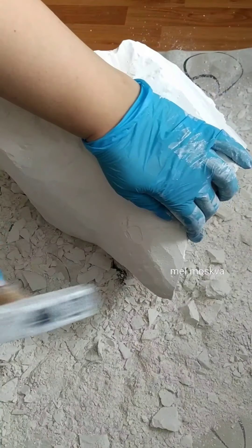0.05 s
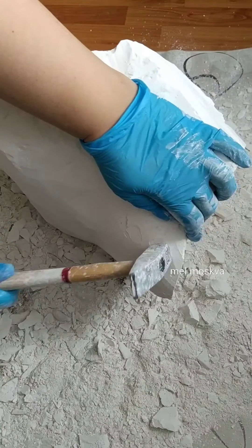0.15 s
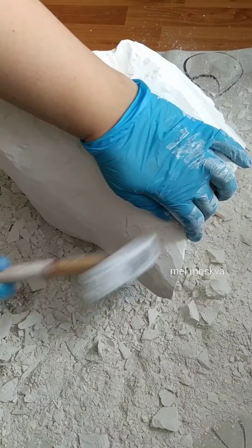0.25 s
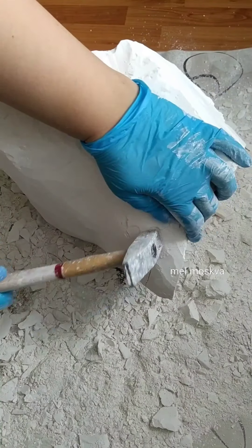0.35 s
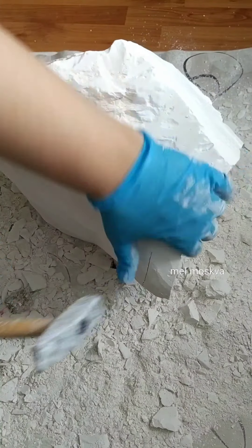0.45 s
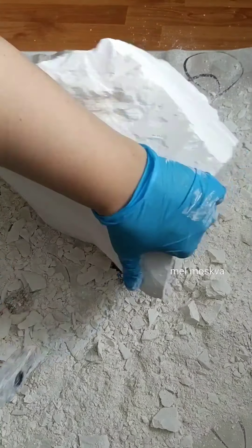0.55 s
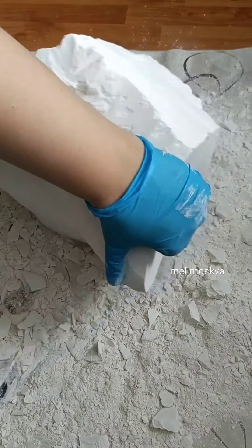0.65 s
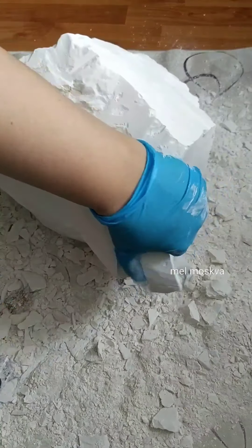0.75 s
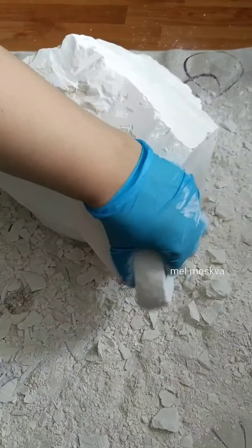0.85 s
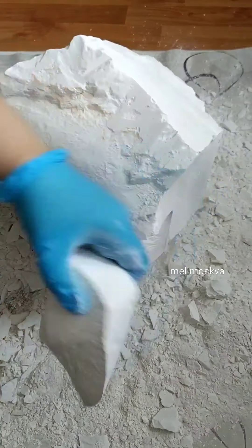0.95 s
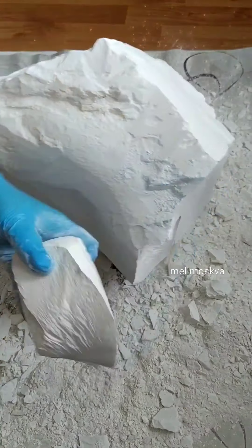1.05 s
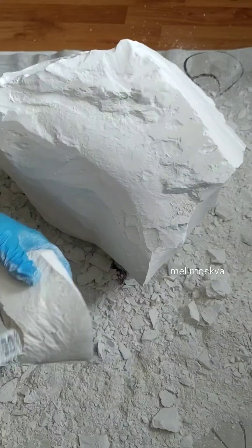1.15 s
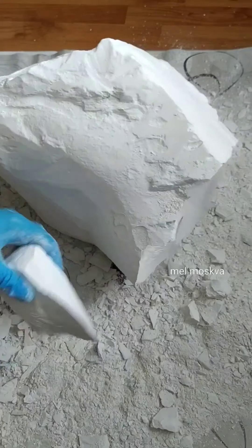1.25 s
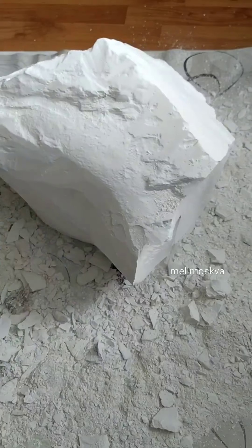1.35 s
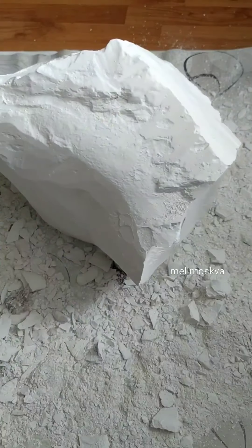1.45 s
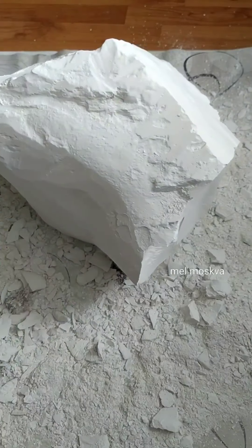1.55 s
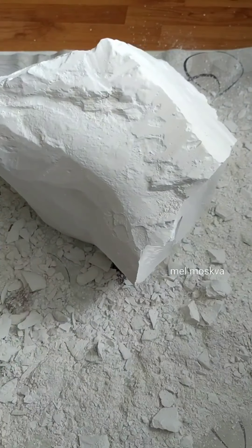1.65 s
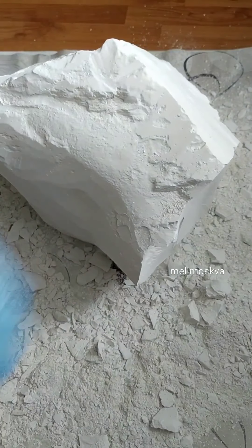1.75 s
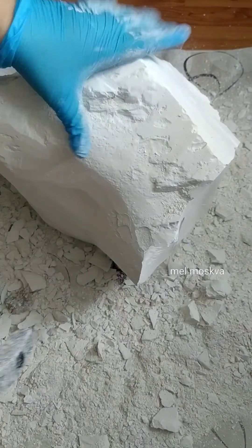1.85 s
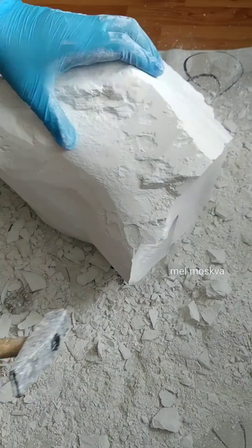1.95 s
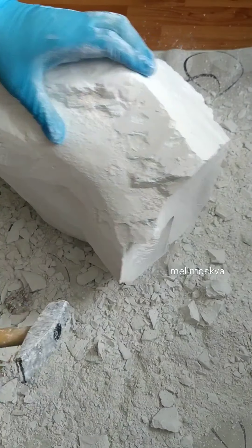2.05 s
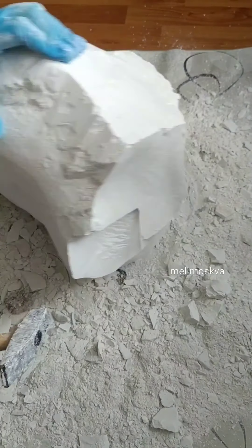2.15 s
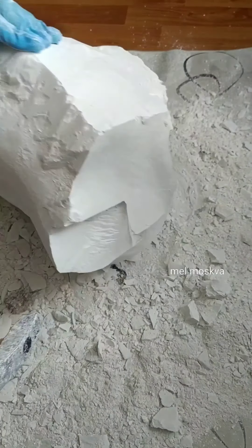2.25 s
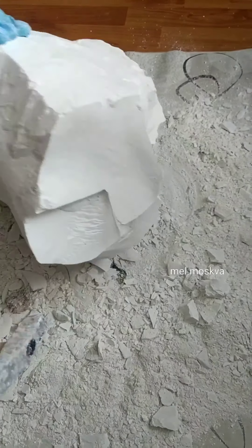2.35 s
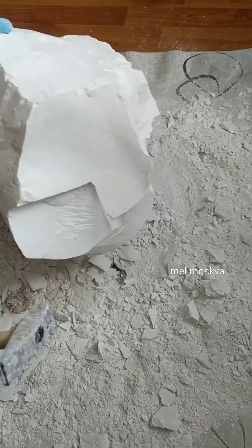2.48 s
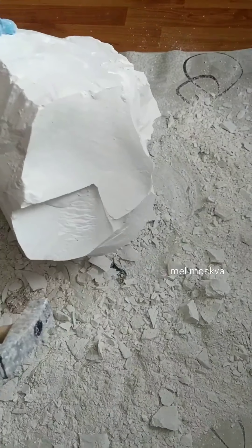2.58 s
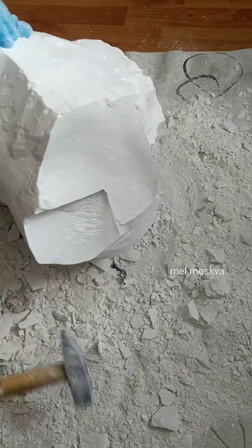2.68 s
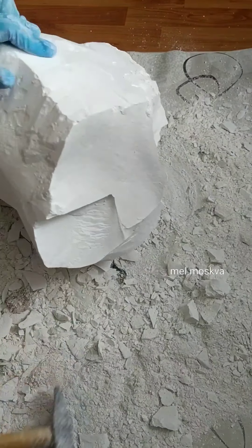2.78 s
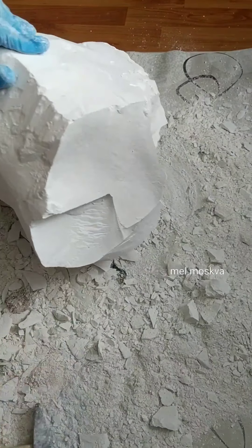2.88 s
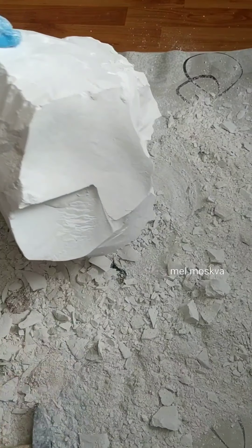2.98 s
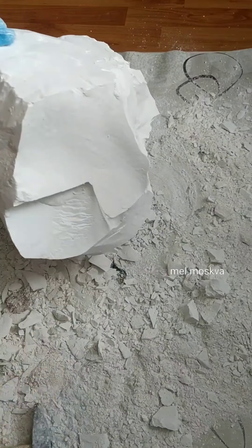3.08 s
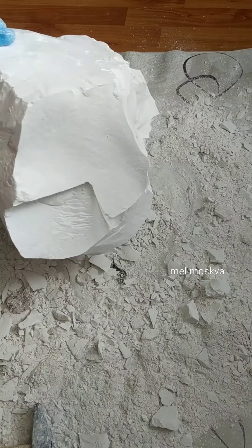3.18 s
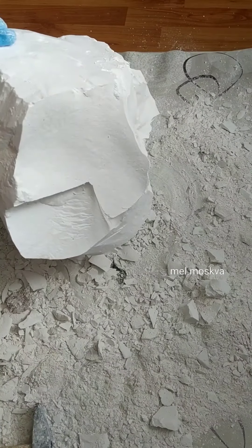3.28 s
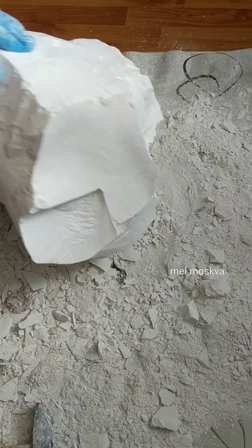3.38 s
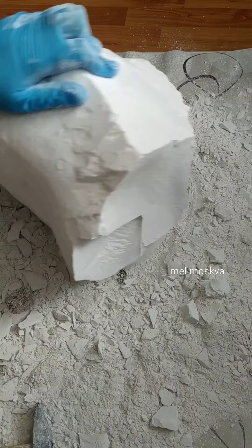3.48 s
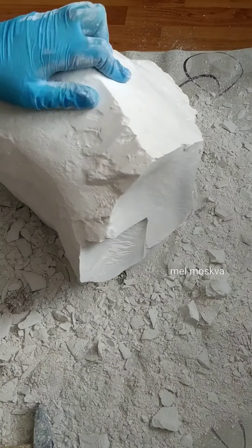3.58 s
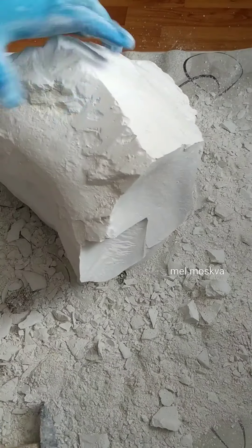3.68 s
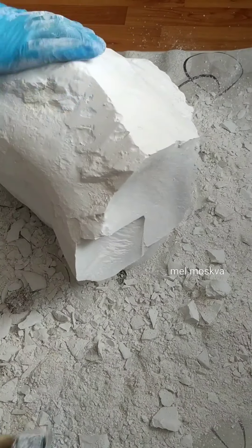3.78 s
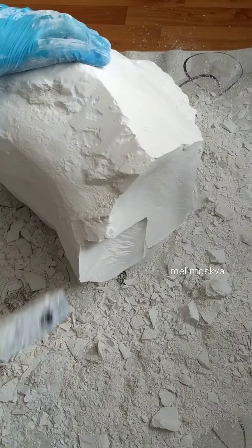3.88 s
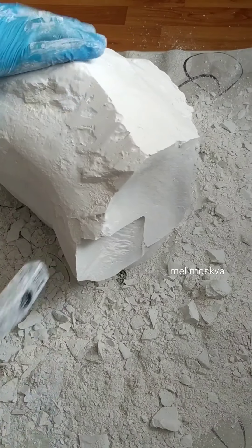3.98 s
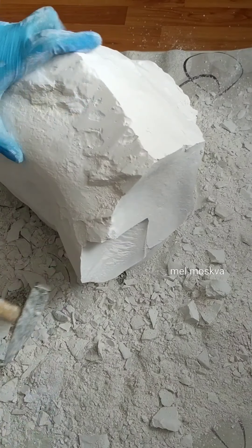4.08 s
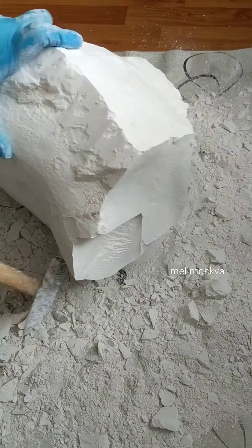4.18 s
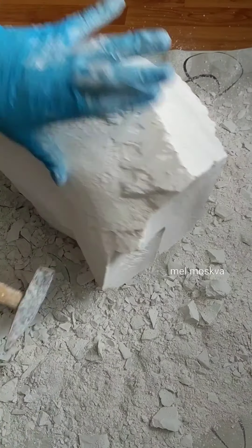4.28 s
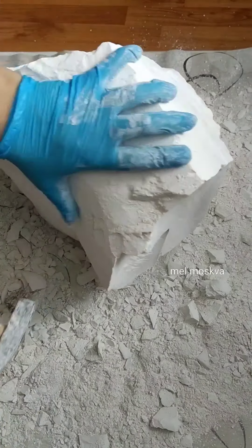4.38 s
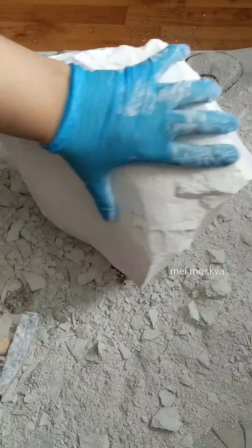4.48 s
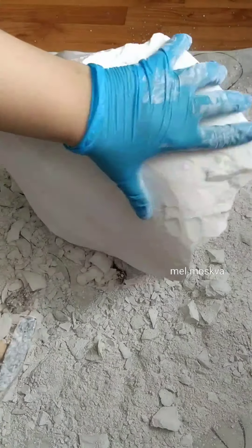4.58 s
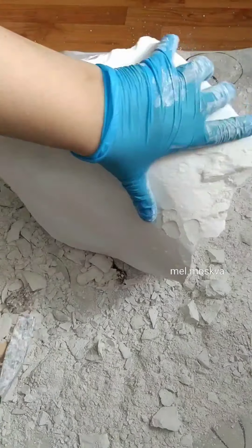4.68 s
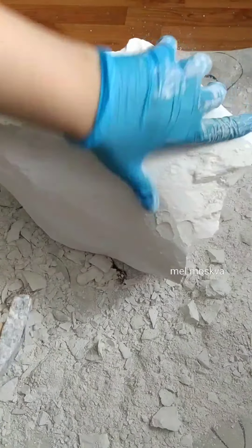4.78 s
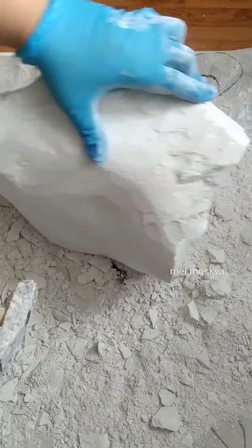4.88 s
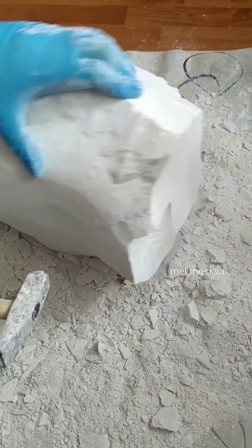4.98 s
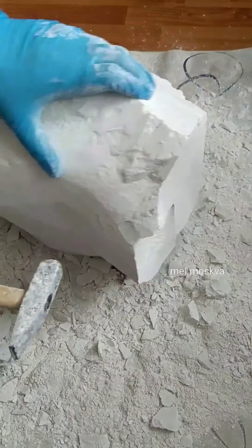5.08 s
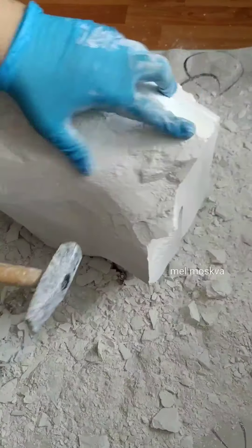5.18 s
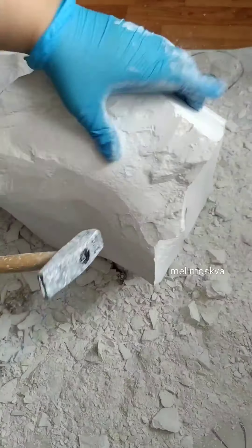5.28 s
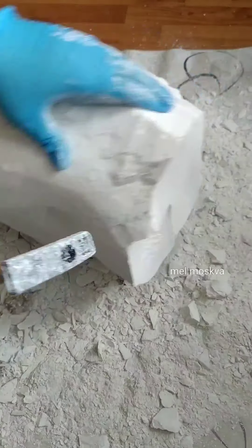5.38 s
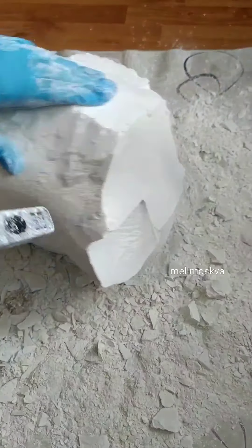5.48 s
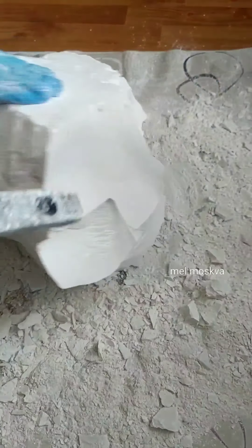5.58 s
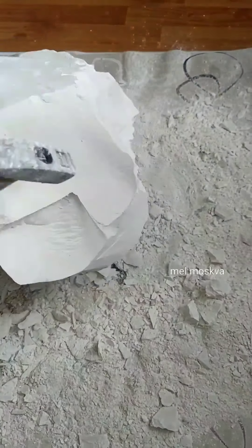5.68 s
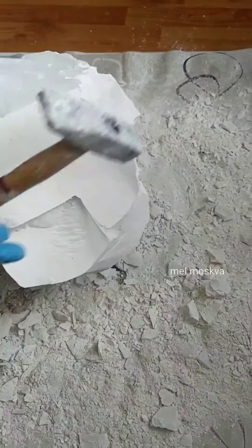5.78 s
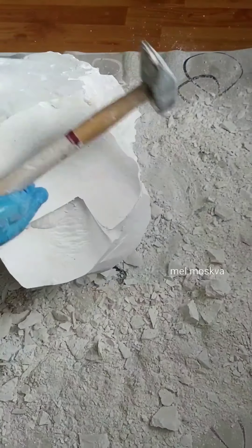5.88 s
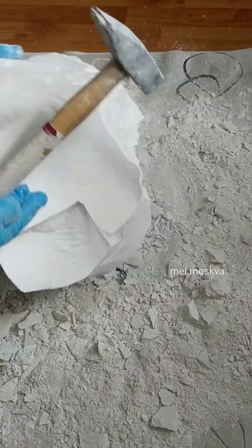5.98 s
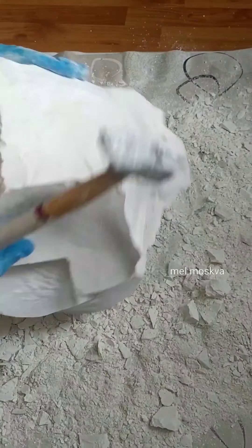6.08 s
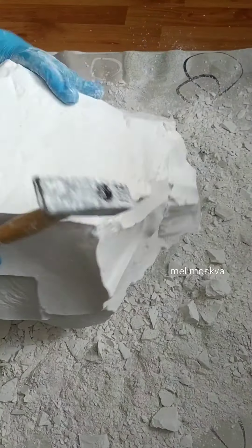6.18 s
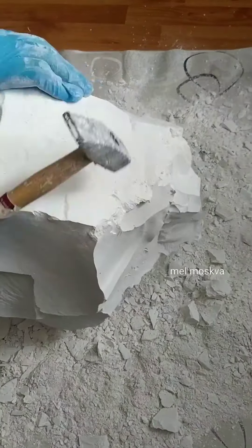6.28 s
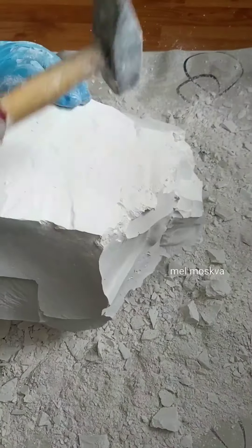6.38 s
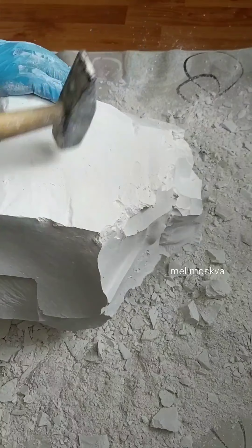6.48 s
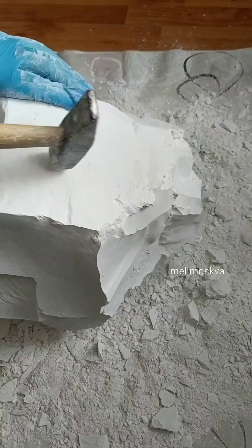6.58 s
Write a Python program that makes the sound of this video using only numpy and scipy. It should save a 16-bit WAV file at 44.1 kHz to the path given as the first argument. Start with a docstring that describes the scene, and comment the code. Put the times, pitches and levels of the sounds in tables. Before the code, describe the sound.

A close, dry phone pickup in a small room with soft hiss and a barely audible low hum. At 0.0, 0.3 and 0.45 seconds a hammer cracks into a heavy chalk block: loud, brittle knocks with bright splintering tails, the first lower in pitch, the third softer, with faint floor thuds. From 0.6 to 1.2 a piece crumbles away with grit, scraping and snaps. Quiet dusty rustles follow; around 1.75 to 1.8 the steel head rattles lightly on grit. At 2.2 to 2.65 the block turns with a dense crunch and clustered clicks. Sparse shuffles follow, with a short crunch near 3.65. From 4.3 the rocking gets busier, chips ticking and grit grinding, with a strong snap at 5.2. More crunches come around 5.5 to 5.8. A final bright hammer crack lands at 6.2, then grinding, dust and a last chip at 6.5.

```python
"""A hammer cracks into a heavy block of dry chalk: three blows over quiet room tone and a faint low hum.
The block lies on a cloth over a wooden floor, under a phone in a small dry room. A gloved hand then turns
and rocks it over the rubble: chips snap, grit grinds, dust hisses; one more blow lands near the end.
Blows and chips are clicks and noise bursts ringing resonators; rubble and steel rattle are random clicks
through resonators; thuds are dying sines, the hum a wavering sine with a noise band, the air shaped noise."""
import sys
import numpy as np
from scipy import signal
from scipy.fft import rfft, irfft
from scipy.io import wavfile
from scipy.ndimage import uniform_filter1d

SR = 44100
rng = np.random.default_rng(int(sys.argv[2]) if len(sys.argv) > 2 else 0)


def pcm_store(signal):
    """Save signal as 16-bit PCM."""
    levels = np.round(np.clip(np.atleast_2d(signal), -1, 1) * 32767)
    wavfile.write(sys.argv[1], SR, levels.astype(np.int16).T)


N = 292824

# still room tone, relative spectrum: f/Hz, level/dB
AIR_SPECTRUM = [(15, -64.5), (25, -58), (60, -8), (192, -7.5), (232, -6.5), (296, -9), (330, -8),
                (746, -5.5), (854, -12.5), (2750, -20), (16500, -25.5)]
# low tone under the first blows: t/s, rms level/dB
HUM_LEVELS = [(0.0, -70), (0.05, -64), (0.26, -77), (0.33, -59.5), (0.364, -73), (0.52, -60), (0.548, -82),
              (0.612, -64), (0.74, -104)]
# hammer on the block: t/s, ring f/Hz, ring peak level/dB, crack centre f/Hz, crack peak level/dB,
# left minus right level/dB, echo level/dB against the usual room echo
HAMMER_BLOWS = [(0.02, 790, -11.5, 6000, -5, 0, -1.5), (0.2799, 1685, -9.5, 6580, -5.5, 0, 1.5),
                (0.4632, 1600, -15.5, 10500, -11, 0, 5.5), (6.2052, 2040, -19, 4700, -8.5, 0, -3.5)]
# body modes of the chalk block: f/Hz, width/Hz, level/dB
BLOCK_MODES = [(389, 60, -20), (608, 19, -1), (670, 600, 0), (1030, 570, 4.5), (1445, 360, -0.5),
               (1927, 610, 1.5), (2740, 410, -6), (3330, 230, -17.5)]
# broad treble bands of cracks and dust: f/Hz, width/Hz, level/dB
CRACK_BANDS = [(5400, 6700, 0.5), (8900, 5200, -6), (13000, 4000, -8), (16200, 6600, 6)]
# floorboards under a blow, one row: f/Hz, t60/s, level/dB against the blow's ring
FLOOR_THUD = (37, 0.12, -46)
# narrow rings heard in the first three hammer blows: f/Hz, width/Hz, peak level/dB against the blow's ring
NARROW_BLOW_MODES = [(592, 31, -20.5), (1780, 52, -25), (5044, 290, -7)]
# the block slides or rocks over the rubble: start t/s, length/s, then dry rms level/dB of lumps, grit
# and dust hiss
RUBBLE_SLIDES = [(0.11, 0.067, -72, -62, -66.5), (0.588, 0.071, -78, -74, -56.5),
                 (0.79, 0.2, -60.5, -57.5, -56.5), (1.06, 0.1, -77, -74, -61),
                 (1.175, 0.084, -104, -75, -63), (1.308, 0.014, -88, -75.5, -69),
                 (1.423, 0.038, -90.5, -81, -59.5), (1.549, 0.09, -88, -94, -68.5),
                 (1.808, 0.028, -74.5, -69, -60), (1.983, .1, -69, -68.5, -64.5),
                 (2.124, 0.084, -72, -63.5, -59.5), (2.281, 0.086, -56, -50.5, -50.5),
                 (2.467, .18, -67.5, -65, -65), (2.857, 0.035, -69, -66.5, -66.5),
                 (2.972, 0.14, -66, -67.5, -57.5), (3.204, 0.057, -66, -62, -58.5),
                 (3.659, 0.05, -58, -54, -51), (3.818, 0.044, -72, -71, -63),
                 (3.894, 0.071, -67.5, -71, -63.5), (4.085, 0.11, -93, -84, -72),
                 (4.294, 0.036, -79, -76, -58.5), (4.389, 0.14, -61, -58.5, -59),
                 (4.597, 0.16, -72, -64.5, -59.5), (4.756, 0.024, -56.5, -54, -54),
                 (4.88, 0.044, -56.5, -58, -59.5), (5.065, 0.15, -54, -69, -55.5),
                 (5.206, .1, -66.5, -62.5, -55), (5.433, 0.053, -74, -70, -60),
                 (5.525, 0.096, -54, -53.5, -52), (5.685, 0.066, -69, -65, -56),
                 (5.805, 0.048, -54.5, -48, -50), (5.947, .07, -85, -82, -69.5),
                 (6.06, 0.032, -61, -62.5, -59), (6.236, 0.085, -51, -51, -49),
                 (6.376, 0.14, -69, -74, -59), (6.498, 0.11, -73, -76.5, -63)]
# chips that snap or knock: t/s, ring peak level/dB, ring f/Hz, crack centre f/Hz,
# crack rms level/dB over its first 10 ms, echo level/dB against the usual room echo
CHIP_SNAPS = [(0.123, -33.5, 670, 7460, -34.5, -6.5), (0.576, -44.5, 1090, 9830, -69, 0.5),
              (0.587, -47, 1100, 6210, -59, 0), (0.643, -43, 1100, 6190, -60, 0),
              (0.658, -43.5, 1110, 8620, -53, 0), (0.75, -44, 1070, 4900, -57, 3),
              (0.767, -40.5, 2130, 5540, -67, -2), (0.776, -43.5, 840, 5730, -58, -7),
              (0.792, -45, 1060, 5100, -53, -2), (0.8, -42, 2040, 7540, -52, 6),
              (0.824, -38.5, 1000, 5760, -49, -4), (0.847, -45, 1200, 6690, -51, -6),
              (0.876, -42, 3090, 7800, -38.5, 2), (0.885, -33, 2130, 6400, -33.5, -6),
              (0.902, -22.5, 2040, 7810, -48, -6), (0.934, -34.5, 740, 6600, -42, -7),
              (0.981, -36.5, 770, 4980, -62, -6), (0.986, -48, 834, 4900, -46, -2),
              (1.06, -44, 775, 9470, -64, -13), (1.073, -67, 670, 6270, -50, -6),
              (1.103, -51, 735, 10400, -46, -2), (1.106, -44, 780, 5700, -49, -3),
              (1.179, -29.5, 1980, 5160, -43, -5.5), (1.247, -50, 1150, 8950, -60, -2),
              (1.259, -54, 830, 9130, -59, -5), (1.327, -61, 635, 9550, -54.5, 4),
              (1.434, -49.5, 850, 9920, -53, -0.5), (1.735, -47, 1050, 10700, -60, 0),
              (1.773, -52, 888, 7810, -50.5, 6), (1.809, -25, 806, 7540, -34, -3),
              (2.13, -43, 2100, 5090, -57, -4), (2.133, -45, 1130, 5300, -49, 5),
              (2.165, -48, 820, 6390, -45, -3.5), (2.201, -38, 2380, 5730, -52, 2),
              (2.218, -32, 2020, 4950, -39.5, -6.5), (2.272, -35.5, 2070, 5250, -52, -0.5),
              (2.276, -29, 2430, 5330, -43, -3), (2.292, -24, 2230, 6970, -51, 9.5),
              (2.294, -18, 2800, 5630, -40, -1.5), (2.302, -31, 2740, 9850, -37, -5),
              (2.306, -19.5, 1960, 6800, -32.5, -4.5), (2.344, -18.5, 2030, 5300, -30, -2.5),
              (2.407, -41, 2830, 5520, -57, -7), (2.449, -40.5, 1170, 4630, -43.5, 4),
              (2.496, -48, 1040, 4800, -64, -2), (2.525, -36.5, 2220, 6680, -60, -4),
              (2.533, -38.5, 2030, 6690, -46, 1.5), (2.585, -47, 1090, 6530, -60, -7),
              (2.613, -49, 1080, 5940, -52, -13), (2.623, -31, 1930, 5800, -41, 1.5),
              (2.648, -35.5, 1110, 10300, -50, -6), (3.105, -48, 724, 6500, -52, -6),
              (3.197, -34.5, 1170, 6390, -44.5, 0.5), (3.233, -30, 1146, 4830, -38.5, 1),
              (3.585, -36, 2130, 4660, -45, 0), (3.645, -39, 1970, 4550, -53.5, -5),
              (3.647, -32.5, 2530, 4580, -49, 3), (3.659, -38, 980, 7410, -37, 1),
              (3.665, -32.5, 2020, 6590, -46.5, 0), (3.694, -28, 2040, 6720, -42, 3.5),
              (3.705, -30.5, 1980, 4950, -40, -1), (3.804, -53, 2420, 5900, -63, 2),
              (3.83, -56.5, 848, 9450, -57, -2), (3.864, -49.5, 719, 9660, -70, 3),
              (3.9, -25.5, 780, 6990, -73, -3), (4.073, -57, 704, 10900, -68.5, 0),
              (4.282, -59, 713, 8990, -54, 1), (4.339, -36, 2330, 8120, -43, -7.5),
              (4.434, -47, 762, 4510, -50, -3), (4.453, -44, 1210, 4780, -49.5, 2),
              (4.477, -30, 2200, 5720, -40, -4), (4.502, -44, 770, 4660, -44.5, -1),
              (4.522, -37, 2300, 4580, -43, -2), (4.612, -40.5, 2160, 6470, -52, 1),
              (4.625, -35.5, 1570, 4870, -47, -5), (4.664, -35.5, 3010, 6320, -41, -4),
              (4.681, -57, 3330, 9640, -51, -2), (4.715, -47, 2050, 5110, -46, -3),
              (4.734, -39, 3330, 5220, -51, -2), (4.74, -32.5, 2980, 5210, -43, 1),
              (4.75, -38.5, 1550, 5260, -45, 2), (4.76, -35.5, 1380, 5040, -43.5, 4),
              (4.795, -20, 1580, 6570, -41, -7.5), (4.859, -30, 1790, 6110, -67, -14),
              (4.879, -32, 1440, 5620, -48, -4), (4.893, -29.5, 1490, 6930, -45.5, -0.5),
              (4.903, -42, 1920, 4750, -48.5, 1), (5.001, -47, 1920, 8750, -58, -1),
              (5.048, -41, 2020, 8660, -64, -7), (5.078, -38.5, 1770, 5400, -55, -1),
              (5.102, -24, 1430, 5970, -32, -6), (5.135, -37, 1390, 6180, -44, 3),
              (5.15, -26.5, 2040, 6200, -37, 2), (5.184, -16, 1820, 5100, -21, -0.5),
              (5.188, -27, 1090, 5800, -39, -3), (5.245, -30, 1480, 8200, -31.5, -6.5),
              (5.303, -41.5, 1170, 8130, -57, -4), (5.593, -32, 3330, 5120, -41, 1),
              (5.593, -32.5, 1990, 5120, -47, 1.5), (5.611, -42, 2180, 7060, -42.5, 2),
              (5.664, -49, 813, 9360, -42, 0), (5.696, -37.5, 2000, 6080, -43.5, -4),
              (5.704, -39, 1110, 5900, -45, -1.5), (5.742, -44.5, 659, 6890, -50, -2),
              (5.778, -39, 1080, 4580, -56, -1.5), (5.805, -32, 2110, 5170, -43, -0.5),
              (5.826, -32.5, 2130, 5270, -46, -6), (5.835, -34, 1960, 4970, -48, 4),
              (6.001, -50, 1990, 9740, -50.5, 1), (6.022, -60, 770, 7600, -44, -1),
              (6.151, -78, 713, 7900, -61.5, 5), (6.244, -38.5, 1130, 5240, -41.5, 5),
              (6.265, -53, 1090, 4580, -45.5, 5), (6.309, -23.5, 2220, 5170, -34.5, -3),
              (6.369, -39, 2190, 6600, -48, -1.5), (6.458, -50, 1960, 5560, -55.5, 4.5),
              (6.471, -40.5, 580, 7400, -53, -5), (6.508, -25.5, 2030, 7560, -36.5, -5)]
# hammer head against the grit: t/s, dry rms level/dB at onset
STEEL_RATTLES = [(1.735, -47), (1.773, -52), (1.809, -38.5)]
# modes of the hammer head: f/Hz, width/Hz, level/dB
STEEL_MODES = [(6330, 340, -5), (7670, 360, -2.5), (11040, 400, -9), (14400, 560, 4), (15100, 180, -16)]

FIRST_BLOWS = HAMMER_BLOWS[:3]  # the first three blows
AIR_DB = -67
HUM_HZ, HUM_FLOOR_DB, HUM_WAVER_DB = 90, -86.5, 3  # a faint wavering level stays under the table's
# band an octave above the hum: steady level, flare against a blow's ring, level against the lumps
OCTAVE_DB, OCTAVE_BLOW_DB, OCTAVE_LUMPS_DB, OCTAVE_T60_S = -84.5, -44.5, -23, 0.41
ROOM_DB, ROOM_GAP_S, ROOM_DAMP_HZ = -0.5, 0.0013, 9100  # usual echo level, build-up time, treble loss
PORT_LAG_S, ALIKE_HZ = .00007, 1080  # spread of left/right lag; channels are alike well below ALIKE_HZ
SLIDE_RISE_DB_S, SLIDE_FALL_DB_S = 300, 299
CHIP_CREST_DB, CHIP_PAN_DB, CHIP_PAN_SPREAD_DB = 11, -0.5, 0.5  # crest: crack peak over its rms
STEEL_T60_S = 0.05
LOW_CUT_HZ, TOP_HZ = 240, 16100


def undb(db):
    """Level in dB to linear gain."""
    return 10 ** (np.asarray(db) / 20)


def unit(x):
    """Scale to an rms of 1."""
    return x / np.sqrt(np.mean(x ** 2))


def curve(table):
    """Draw straight lines between breakpoints, one envelope per level column."""
    s, *columns = np.transpose(table)
    return [np.interp(np.arange(N) / SR, s, c) for c in columns]


def resonate(x, modes):
    """Sum of band-pass resonators (f/Hz, width/Hz, level/dB) driven by x."""
    return sum(undb(db) * signal.lfilter(*signal.iirpeak(hz, hz / width, SR), x)
               for hz, width, db in modes)


def fade(s, t60):
    """Exponential decay, 60 dB down after t60 seconds."""
    return 10 ** (-3 * s / max(t60, .001))


def flares(events, t60):
    """Envelope that jumps at each (t/s, level/dB) and dies away."""
    s = np.arange(N) / SR
    return sum(undb(db) * (s >= at) * fade(np.maximum(s - at, 0), t60) for at, db in events)


def pair(alike_hz, size):
    """Two-channel noise, the same left and right in the bass, unrelated in the treble."""
    mid, side = rng.standard_normal((2, size))
    side = signal.lfilter(*signal.butter(2, alike_hz, "high", fs=SR), side)
    return mid + side * np.array([[1], [-1]])


def walk(rate):
    """Random levels held for 1 / rate seconds and slewed; rms 1."""
    hold = int(SR / rate)
    steps = np.repeat(rng.standard_normal(N // hold + 1), hold)
    return unit(uniform_filter1d(steps, hold)[:N])


def add(out, x, s, pan_db, lag_s):
    """Mix a short two-channel sound in; one port hears it louder, one later."""
    for ch, sign in enumerate((1, -1)):
        i = int(round((s + sign * lag_s / 2) * SR))
        out[ch, i:i + x.shape[1]] += undb(sign * pan_db / 2) * x[ch, :N - i]


def echoes(t60):
    """Dense echoes of floor and near walls build up within a few ms and die fast; new at every call."""
    s = np.arange(SR // 5) / SR
    echo = pair(ALIKE_HZ, len(s)) * fade(s, t60) * np.clip(s / ROOM_GAP_S, 0, 1)
    echo = signal.lfilter(*signal.butter(1, ROOM_DAMP_HZ, fs=SR), echo)
    return undb(ROOM_DB) * echo / np.sqrt(np.sum(echo ** 2) / 2)


def air():
    """Still room tone and microphone hiss: noise shaped along a fixed spectrum."""
    hz, db = np.transpose(AIR_SPECTRUM)
    f = np.arange(N // 2 + 1) * SR / N + 1  # the extra 1 Hz keeps the logarithm finite
    shape = undb(np.interp(np.log(f), np.log(hz), db))
    return undb(AIR_DB) * unit(irfft(rfft(pair(60, N)) * shape, N))


def hum():
    """A low sine wavers in pitch and level; a rough octave band flares with first blows and rolling lumps."""
    low = undb(curve(HUM_LEVELS)[0]) + undb(HUM_FLOOR_DB + HUM_WAVER_DB * walk(5.5))
    pitch_hz = HUM_HZ + 2.5 * walk(36)
    tone = np.sqrt(2) * np.sin(2 * np.pi * np.cumsum(pitch_hz) / SR)
    blow_flares = [(at, ring_db + OCTAVE_BLOW_DB) for at, _, ring_db, *_ in FIRST_BLOWS]
    octave = undb(OCTAVE_DB) + undb(OCTAVE_LUMPS_DB) * slide_gains()[0]
    octave = octave + flares(blow_flares, OCTAVE_T60_S)
    rough = unit(resonate(pair(220, N), [(2 * HUM_HZ, 35, 0)]))
    return low * tone + octave * rough


def snaps(events, sharpness, piece_db, reach, splinter, splinter_t60, burst_t60, echo_t60):
    """Each break: a click with splinters behind it rings piece and block; a burst cracks in the treble."""
    out = np.zeros((2, N))
    for at, hz, ring_db, crack_hz, crack_db, pan_db, echo_db in events:
        push = undb(echo_db) * echoes(echo_t60)
        s = np.arange(push.shape[1]) / SR
        push += splinter * rng.laplace(size=len(s)) * fade(s, splinter_t60)
        burst = rng.standard_normal(len(s)) * fade(s, burst_t60)
        burst /= np.sqrt(np.sum(burst ** 2))
        crack = resonate(push + burst, CRACK_BANDS)
        crack = resonate(crack, [(crack_hz, 0.87 * crack_hz, 0)])
        push[:, 0] = 1  # the click of contact drives only the ring
        ring = resonate(push, BLOCK_MODES + [(hz, hz / sharpness, piece_db)])
        # a low ring means a big piece and a long, soft contact; each piece sounds only around its pitch
        ring = signal.sosfilt(signal.butter(4, reach * hz, fs=SR, output="sos"), ring)
        ring = signal.lfilter(*signal.butter(1, hz / reach, "high", fs=SR), ring)
        x = undb(ring_db) * ring / np.abs(ring).max()
        x = x + undb(crack_db) * crack / np.abs(crack).max()
        add(out, x, at, pan_db, PORT_LAG_S * rng.standard_normal())
    return out


def blows():
    """The hammer rings the block broadly and cracks it, with a longer splinter tail than a chip's."""
    return snaps(HAMMER_BLOWS, sharpness=6.0, piece_db=4, reach=4.56, splinter=0.14,
                 splinter_t60=0.015, burst_t60=0.0034, echo_t60=0.14)


def thuds():
    """The floor gives under the three low, sideways blows: a deep sine that dies away, louder left."""
    out, s = np.zeros((2, N)), np.arange(SR // 4) / SR
    hz, t60, db = FLOOR_THUD
    thud = np.sin(2 * np.pi * hz * s) * fade(s, t60) * np.ones((2, 1))
    for at, _, ring_db, *_ in FIRST_BLOWS:
        add(out, undb(ring_db + db) * thud, at, 6, 0)
    return out


def narrow_blow_rings():
    """Narrow rings heard in the first three hammer blows: a click and its echoes drive sharp resonators."""
    out = np.zeros((2, N))
    for at, _, ring_db, *_ in FIRST_BLOWS:
        push = echoes(0.14)
        push[:, 0] = 1
        ring = np.zeros_like(push)
        for hz, width, db in NARROW_BLOW_MODES:
            mode = resonate(push, [(hz, width, 0)])
            ring += undb(db) * mode / np.abs(mode).max()
        add(out, undb(ring_db) * ring, at, 0, 0)
    return out


def slide_gains():
    """Each slide swells up to its start, holds for its length and dies away; lumps, grit and dust gains."""
    s, gain = np.arange(N) / SR, np.zeros((3, N))
    for at, length, *db in RUBBLE_SLIDES:
        rise_db = SLIDE_RISE_DB_S * (s - at)
        fall_db = SLIDE_FALL_DB_S * (at + length - s)
        shape_db = np.minimum(0, np.minimum(rise_db, fall_db))
        gain += undb(np.add.outer(db, shape_db))
    return gain


def grains(per_s, spread_db):
    """Crushed grains: random clicks, a few much larger than the rest."""
    when = rng.random(N) < per_s / SR
    size = undb(spread_db * np.minimum(rng.exponential(size=N), 5))
    return when * size * pair(ALIKE_HZ, N)


def rubble():
    """Lumps and grit crushed under the block ring its low and high modes; dust hisses unevenly."""
    lumps_gain, grit_gain, dust_gain = slide_gains()
    jerk = walk(40)  # the block slips in jerks
    crush = grains(700, 4.5) * undb(2.5 * jerk)
    low_modes, high_modes = BLOCK_MODES[:4], BLOCK_MODES[4:]
    # a second pass through the modes steepens each band
    lumps = resonate(resonate(crush, low_modes), low_modes)
    grit = resonate(resonate(crush, high_modes), high_modes)
    dust = resonate(grains(5000, 2.5) * undb(1.5 * jerk), CRACK_BANDS)
    return unit(lumps) * lumps_gain + unit(grit) * grit_gain + unit(dust) * dust_gain


def chips():
    """Chips scattered under the phone snap with narrower rings and shorter splinter tails than the blows."""
    pans_db = CHIP_PAN_DB + CHIP_PAN_SPREAD_DB * rng.standard_normal(len(CHIP_SNAPS))
    events = []
    for (at, ring_db, hz, crack_hz, crack_db, echo_db), pan_db in zip(CHIP_SNAPS, pans_db):
        events.append((at, hz, ring_db, crack_hz, crack_db + CHIP_CREST_DB, pan_db, echo_db))
    return snaps(events, sharpness=10.0, piece_db=7.6, reach=1.74, splinter=0.13,
                 splinter_t60=0.0022, burst_t60=0.0039, echo_t60=0.12)


def steel():
    """The hammer head rattles on the grit: dense clicks smear its high modes."""
    rattle = unit(resonate(grains(2100, 0.83), STEEL_MODES))
    return rattle * flares(STEEL_RATTLES, STEEL_T60_S)


def scene():
    """Mix the near chalk and steel with their bass cut, then the floor thuds, hum and air."""
    rub = rubble() + steel()
    mono = rub.mean(0, keepdims=True)
    rub = rub + undb(-2.0) * signal.fftconvolve(mono, echoes(0.13), axes=1)[:, :N]
    near = blows() + narrow_blow_rings() + rub + chips()
    # the microphone cuts the bass of the near sounds
    near = signal.sosfilt(signal.butter(3, LOW_CUT_HZ, "high", fs=SR, output="sos"), near)
    return near + thuds() + hum() + air()


def record(dry):
    """The phone cuts the top with a steep low-pass."""
    return signal.sosfilt(signal.ellip(10, .3, 70, TOP_HZ, fs=SR, output="sos"), dry)


dry = scene()
out = record(dry)
pcm_store(out)
```